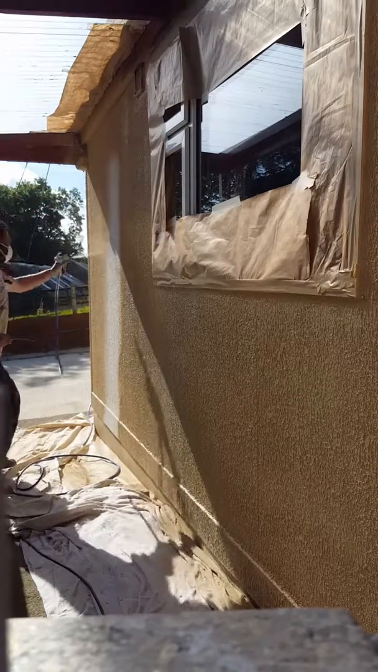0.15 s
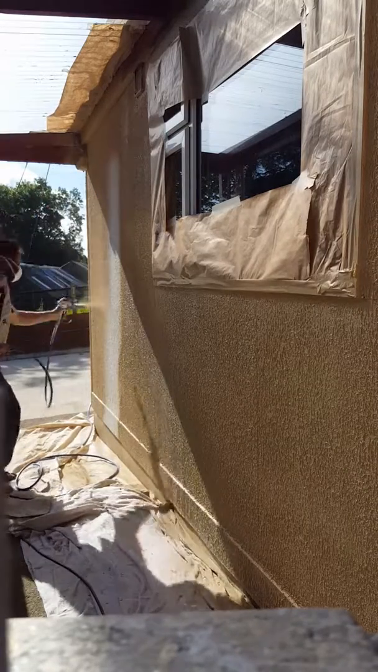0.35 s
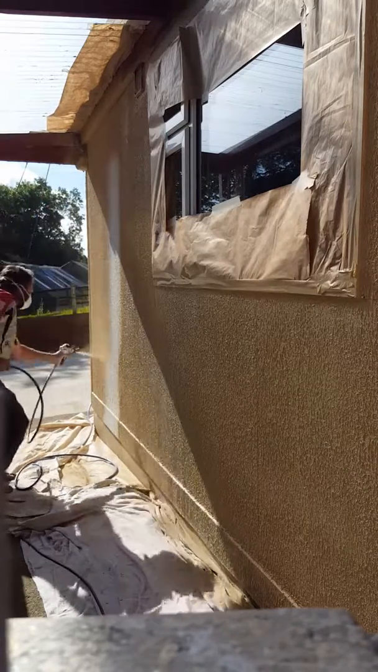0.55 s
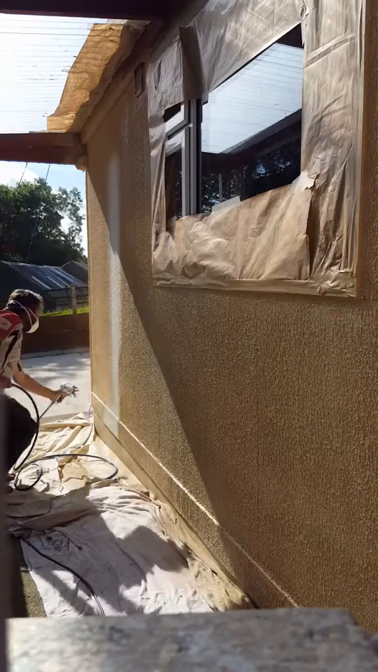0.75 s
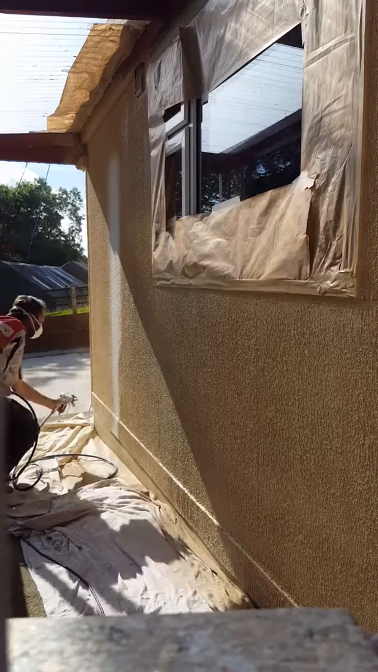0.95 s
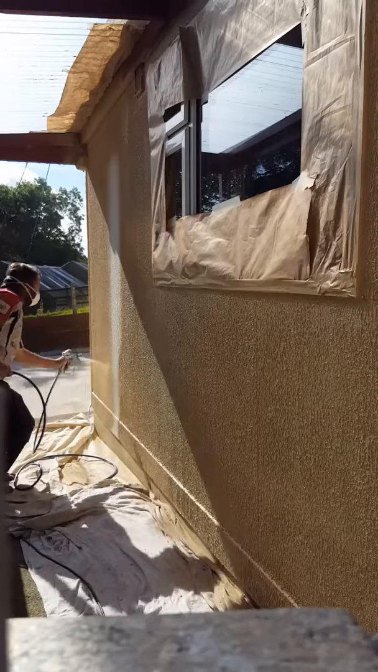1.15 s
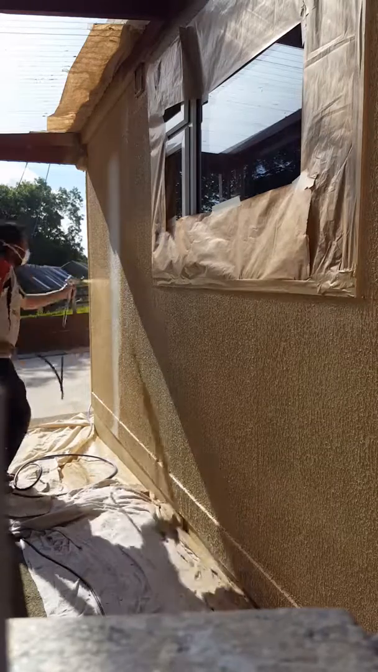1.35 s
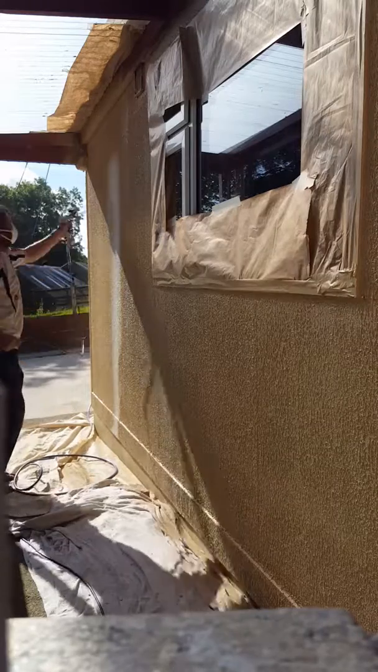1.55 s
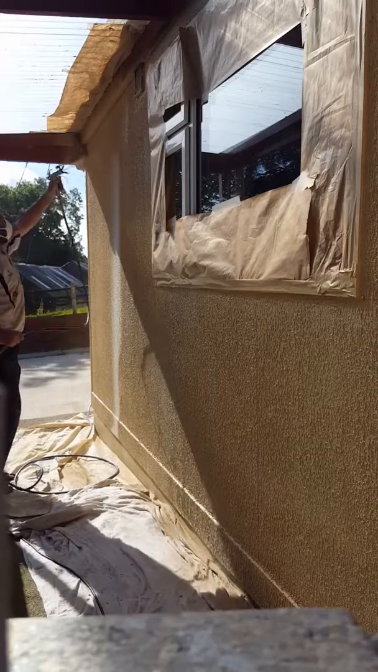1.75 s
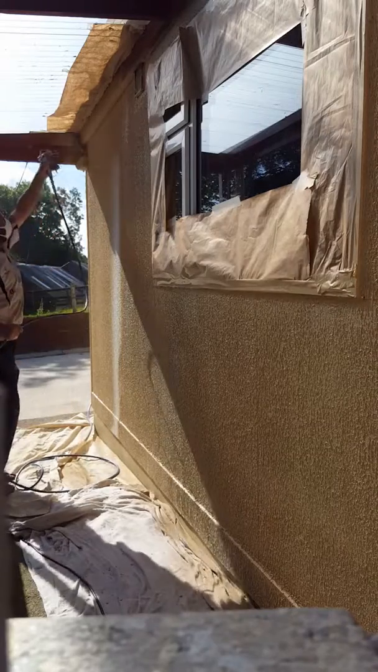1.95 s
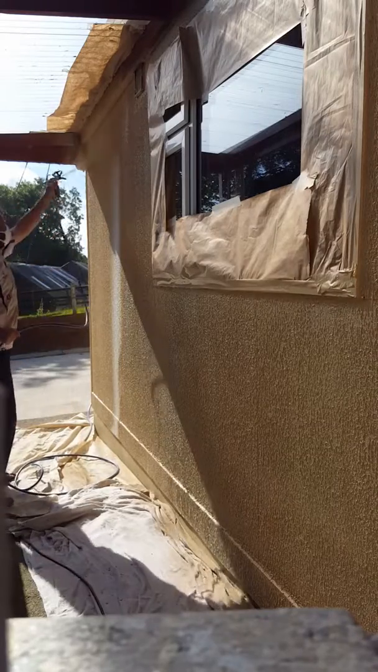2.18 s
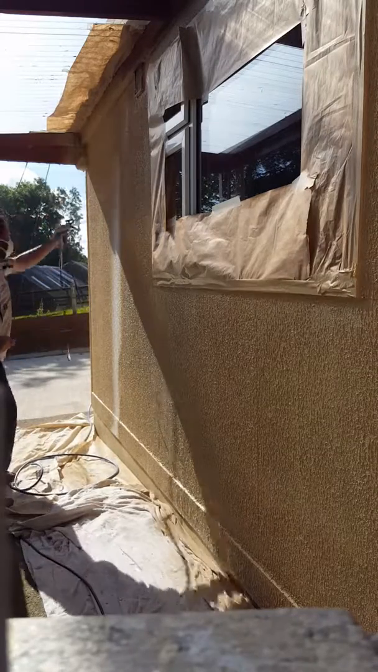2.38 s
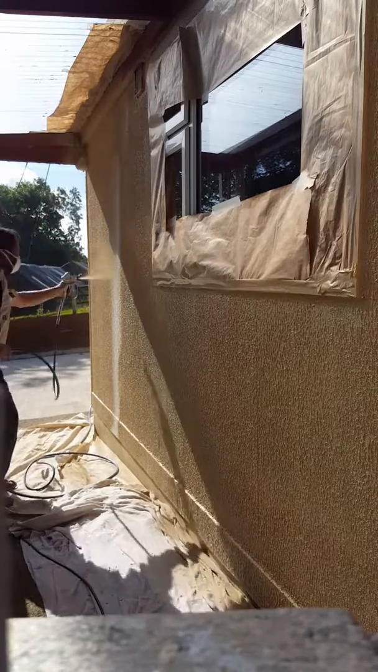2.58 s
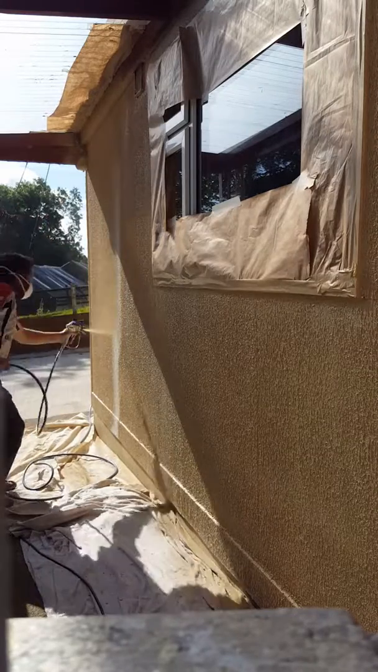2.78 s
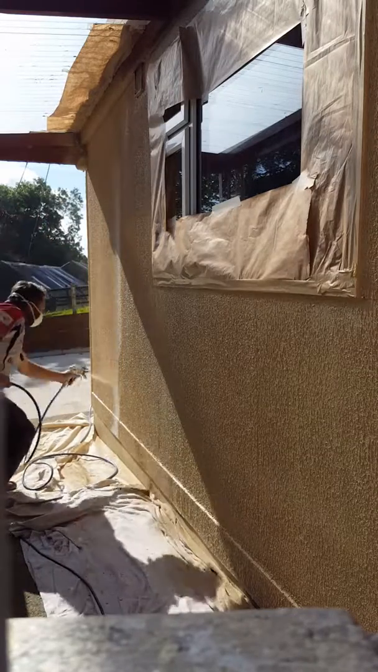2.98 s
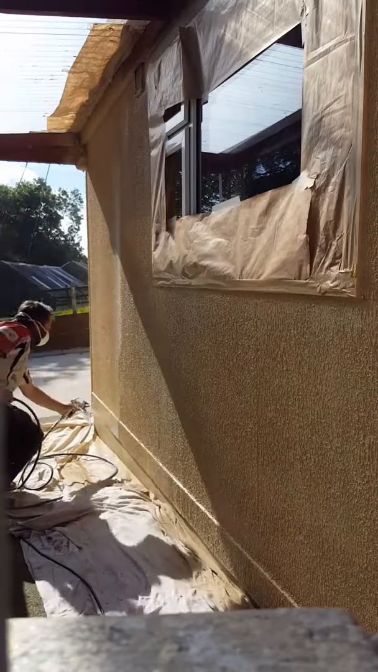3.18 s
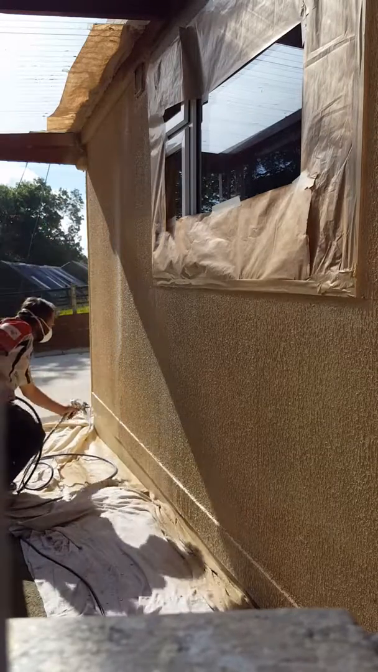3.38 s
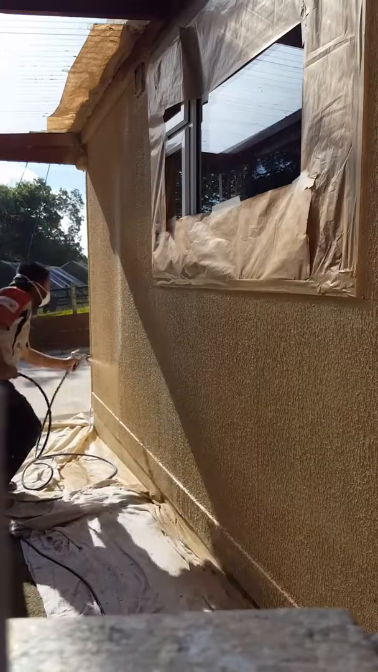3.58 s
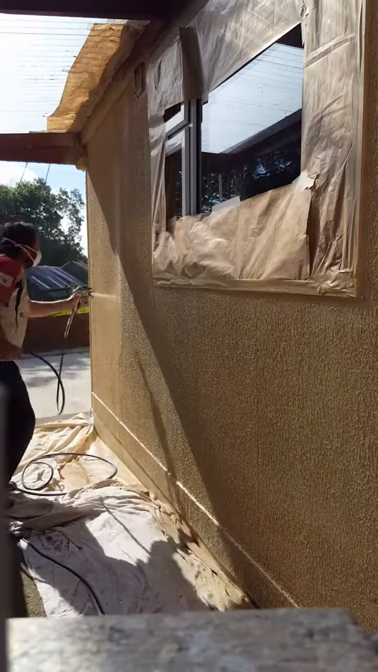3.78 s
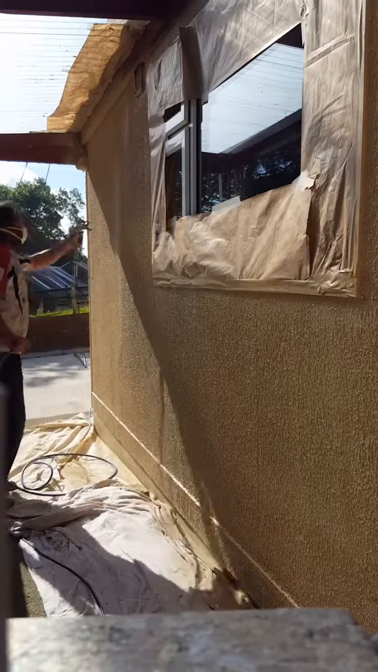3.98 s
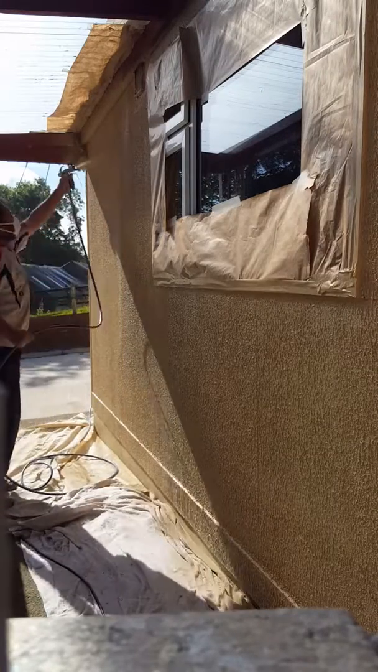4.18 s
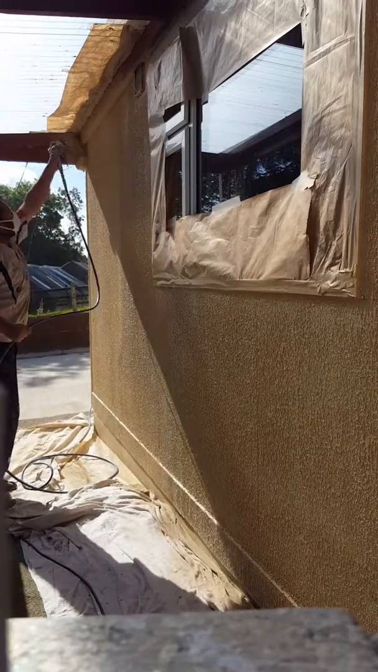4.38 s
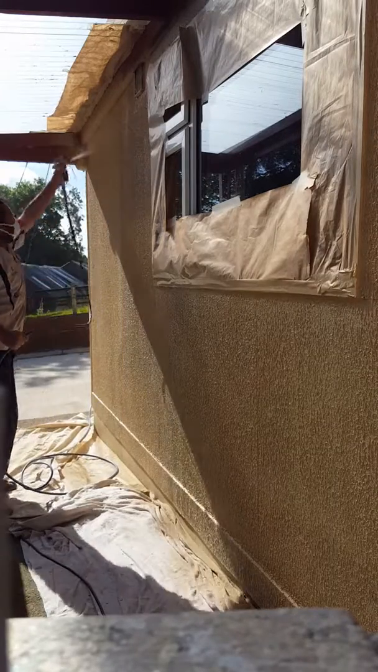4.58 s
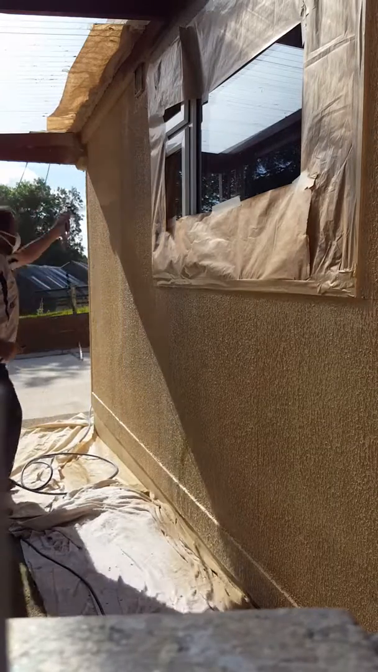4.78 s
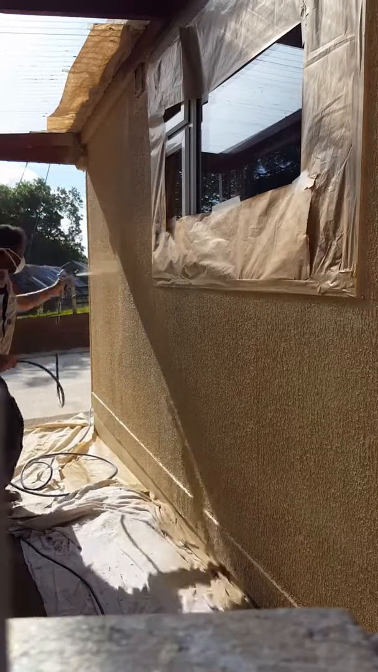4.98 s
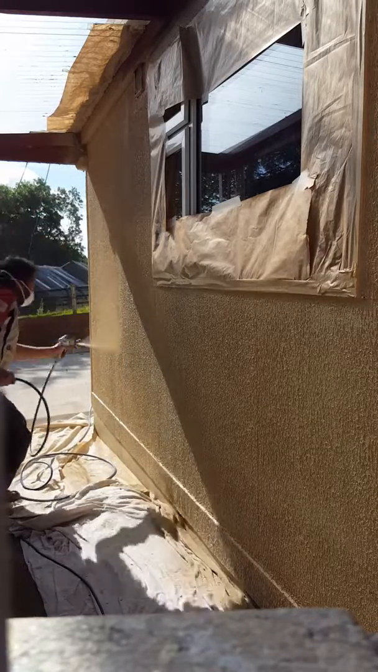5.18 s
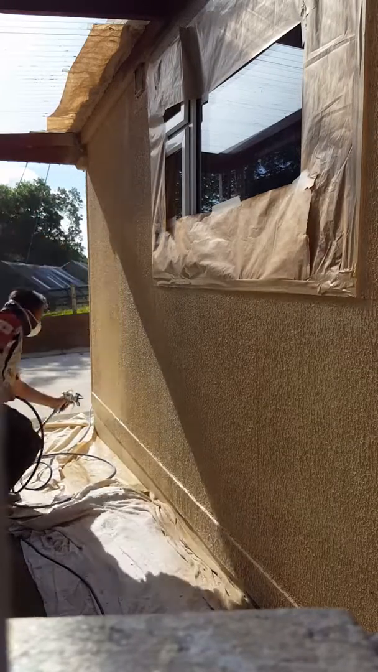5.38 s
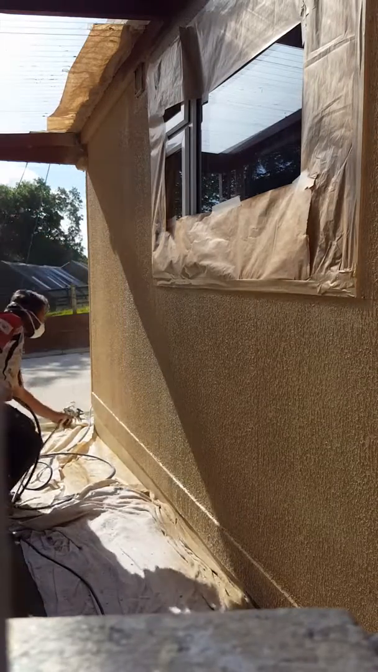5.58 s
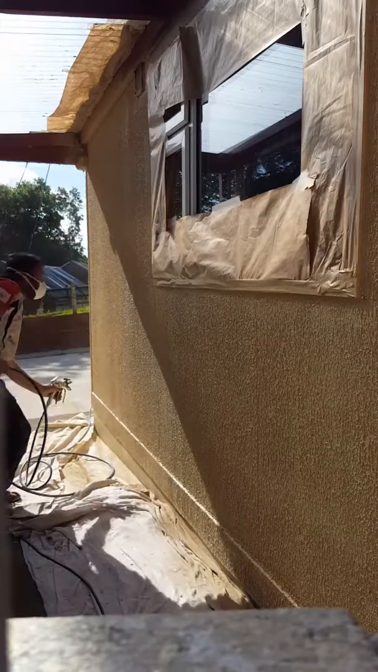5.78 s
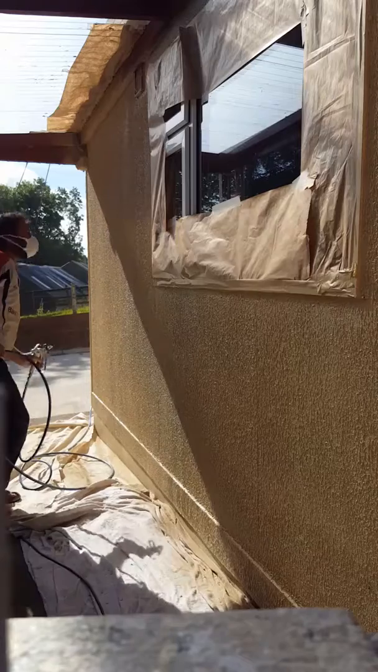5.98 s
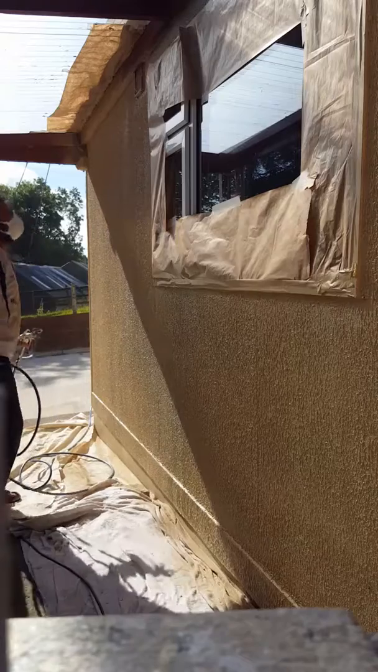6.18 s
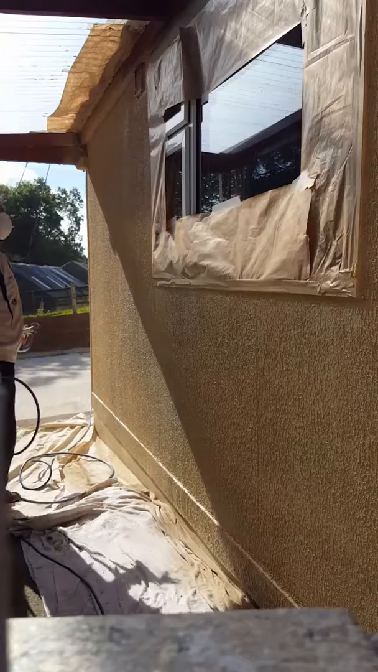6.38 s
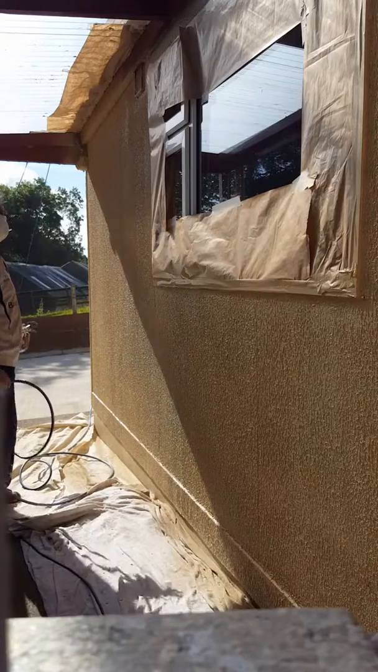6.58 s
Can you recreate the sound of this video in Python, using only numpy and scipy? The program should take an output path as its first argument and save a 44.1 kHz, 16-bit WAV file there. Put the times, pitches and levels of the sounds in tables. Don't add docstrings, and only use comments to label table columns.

```python
import sys
import numpy as np
from scipy import signal
from scipy.io import wavfile
from scipy.ndimage import uniform_filter1d

SR = 44100
rng = np.random.default_rng(int(sys.argv[2]) if len(sys.argv) > 2 else 0)


def voltage_ratio(decibels):
    exponent = np.asarray(decibels, float) / 20
    return 10 ** exponent


def wav_record(signal):
    frames = np.transpose(np.atleast_2d(signal))
    bounded = np.clip(frames, -1, 1)
    quanta = np.round(bounded * 32767).astype(np.int16)
    wavfile.write(sys.argv[1], SR, quanta)


N = 293104
PORT_LAG_S = 0.000482


def evened(x):
    return x / np.sqrt(np.mean(x ** 2) + 1e-20)


def read(points, hz):
    f, value = np.transpose(points)
    return np.interp(np.log(hz + 1), np.log(f + 1), value)


def curves(rows):
    s, *columns = np.transpose(rows)
    return [np.interp(np.arange(N) / SR, s, c) for c in columns]


def wander(length_s):
    size = max(int(length_s * SR), 2)
    once = uniform_filter1d(rng.standard_normal(N), size)
    return evened(uniform_filter1d(once, size))


def tone(hz):
    turns = np.cumsum(hz * np.ones(N)) / SR
    return np.sqrt(2) * np.sin(2 * np.pi * (turns + rng.random()))


def resonate(x, hz, width_hz):
    turn = np.exp(2j * np.pi * np.cumsum(hz * np.ones(N)) / SR)
    r = np.exp(-np.pi * width_hz / SR)
    return 2 * (turn * signal.lfilter([1 - r], [1, -r], x / turn)).real


# frequency in Hz, likeness from 0 to 1.
PORT_LIKENESS = [(30, 1), (160, 1), (270, .92), (700, .85), (1200, 0.74), (2500, 0.12), (5000, 0.16),
                 (9000, 0.0996)]


def noise(spectrum, patchy_db, size=512, tilt_db=None):
    hop = size // 4
    frames, hz = N // hop + 5, np.fft.rfftfreq(size, 1 / SR)
    a, b, c, d, patches = rng.standard_normal((frames, len(hz), 5)).T
    patches = uniform_filter1d(patches, size=4, axis=0)
    patches = evened(uniform_filter1d(patches, size=24, axis=1))
    same = np.clip(read(PORT_LIKENESS, hz), -1, 1)[:, None]
    lag = np.exp(-2j * np.pi * np.maximum(hz - 900, 0) * PORT_LAG_S)[:, None]
    left = a + 1j * b
    right = same * lag * left + np.sqrt(1 - same ** 2) * (c + 1j * d)
    field_db = read(spectrum, hz)[:, None] + patchy_db * patches
    if tilt_db is not None:
        octaves = np.log2((hz[:, None] + 99) / 6000)
        field_db = field_db + octaves * tilt_db[np.minimum(np.arange(frames) * hop, N - 1)]
    z = np.array([left, right]) * voltage_ratio(field_db)
    return evened(signal.istft(z, nperseg=size, noverlap=size - hop)[1][:, :N])


# frequency in Hz, level in dB per Hz.
YARD_WASH = [(30, -25), (60, -5.5), (110, 1.5), (200, -8.5), (300, -12.5), (600, -15), (1000, -9),
             (1500, -17), (2200, -25.5), (3500, -35), (6000, -39.5), (9000, -42.5), (10500, -51.5),
             (14000, -48)]
# time in seconds, fifth order in Hz, level in dB.
ENGINE_IDLE = [
    (0, 110.5, -52),
    (1.1, 109.8, -53.5),
    (1.66, 112.3, -48.5),
    (3.3, 112.4, -50.5),
    (3.6, 111, -50.5),
    (5.6, 111, -52.5),
    (5.9, 109.7, -48),
    (6.65, 109.5, -55),
]
# engine order, level in dB.
ORDERS = [(3, -10.5), (5, 2.5), (6, 0), (8, -7.5)]
# time in seconds, pitch in Hz, level in dB.
COMPRESSOR_IDLE = [
    (0, 90.8, -52.5),
    (1.3, 91.9, -48),
    (1.5, 92.4, -62),
    (1.65, 95.2, -46.5),
    (3.0, 94.5, -56),
    (3.9, 90.7, -54.5),
    (4.8, 91.4, -54.5),
    (6.1, 93.5, -50.5),
    (6.65, 92.8, -61),
]


def yard():
    hz, db = curves(ENGINE_IDLE)
    drone = sum(tone(hz * k / 5) * voltage_ratio(db + order_db + 1.9 * wander(0.082)) for k, order_db in ORDERS)
    hz, db = curves(COMPRESSOR_IDLE)
    hz = hz * (1 + 0.0065 * wander(0.092))
    drone += tone(hz) * voltage_ratio(db + 2.0 + 1.2 * wander(0.059))
    drone += tone(2 * hz) * voltage_ratio(db - 9 + 2.1 * wander(0.048))
    drone += tone(122) * voltage_ratio(-58.5)
    late = np.roll(drone, 11)
    return np.array([drone, late]) + noise(YARD_WASH, patchy_db=0.0, size=2048) * voltage_ratio(-44.5)


# start in seconds, length in seconds, pitch in Hz, level in dB.
BIRD_CALL = (6.157, .045, 6520, -58)


def bird():
    s, length, hz, db = BIRD_CALL
    u = np.clip((np.arange(N) / SR - s) / length, 0, 1)
    shape = np.minimum(u * 9, 1) * np.sqrt(1 - u)
    return tone(hz) * voltage_ratio(db) * shape * np.array([[.5], [1]])


CYCLE_S = 0.1812
LABOUR_S = 5.76


def reversals():
    last_s, last_db = 6.099, -34
    at = np.arange(0.085, last_s - CYCLE_S / 2, CYCLE_S)
    late, louder = rng.standard_normal((len(at), 2)).T
    rows = np.transpose([at + 0.003 * late, -32 + 1 * louder])
    return np.vstack([rows, (last_s, last_db)])


# delay in seconds, frequency in Hz, level in dB, t60 in seconds.
KNOCK_RINGS = [(0.0017, 252, -4, 0.086), (0.0021, 332, -4, 0.093), (0, 473, 0, 0.034), (0, 760, -8.5, .03),
               (.006, 1040, -0.5, 0.042), (.012, 1597, -3.5, 0.046), (.008, 1988, -7.5, 0.094),
               (.022, 1400, -17, 0.035), (.09, 913, -12.5, 0.066), (.09, 425, -3.5, .05)]


def knocks(blows):
    out, t = np.zeros((2, N + SR)), np.arange(4000) / SR
    chance = rng.standard_normal((len(blows), len(KNOCK_RINGS), 2))
    for (s, blow_db), row in zip(blows, chance):
        for (delay, hz, db, t60), (louder, higher) in zip(KNOCK_RINGS, row):
            ring = np.sin(2 * np.pi * hz * (1 + 0.013 * higher) * t)
            ring *= 1 - np.exp(-t / 0.0027)
            k = round((s + abs(delay)) * SR)
            out[:, k:k + len(t)] += voltage_ratio(blow_db + db + 1.3 * louder - 60 * t / t60) * ring
    return out[:, :N]


def mesh(speed, cycle):
    t = np.arange(N) / SR
    sag = 0.0199 * np.sin(2 * np.pi * (cycle - .05))
    hz = 1803 * speed * (1 + sag + 0.0061 * wander(0.0063))
    note = tone(hz) * voltage_ratio(-50.5 + 2.9 * wander(.012) + 1.9 * wander(0.096))
    surge = sum((t >= pull) * np.exp(-abs(t - pull) / 0.6) for pull, *_ in STROKES)
    strain = (t > LABOUR_S) * (t < LABOUR_S + CYCLE_S)
    bite_db = -38.5 - 16 * (1 - surge) + 16 * strain + 1.6 * wander(0.11)
    peak = np.exp(-.5 * ((cycle - 0.8) / 0.09) ** 2)
    note += tone(1737 * speed) * peak * voltage_ratio(bite_db)
    return np.array([note, np.roll(note, 12)])


# frequency in Hz, width in Hz, level in dB.
HOUSING_MODES = [(1803, 43, -50), (924, 30, -52.5), (1064, 42, -66), (1337, 25, -51), (1438, 39, -59),
                 (1530, 86, -60), (422.5, 35, -54.5), (6040, 220, -66)]


def housing(speed):
    whine = np.zeros((2, N))
    for hz, width_hz, db in HOUSING_MODES:
        common, own = rng.standard_normal(N), rng.standard_normal((2, N))
        shared = common * [[1], [np.cos(hz * 2 * np.pi * PORT_LAG_S)]]
        whine += voltage_ratio(db) * evened(resonate(0.64 * shared + 0.63 * own, hz * speed, width_hz))
    return whine


# frequency in Hz, level in dB per Hz.
MOTOR_NOISE = [(250, -8.5), (450, -5), (900, -0.5), (1300, -3.5), (1800, -1.5), (2150, -11), (2650, -9),
               (2800, -17.5), (4000, -16), (5200, -22.5), (6000, -13.5), (6800, -21), (9400, -21.5),
               (11000, -41)]
# share of the cycle from 0 to 1, whine in dB, noise in dB.
PISTON_LOAD = [(0, 3.5, -3), (.08, -0.5, 2.5), (.16, 4, -1.5), (.42, 1.5, 0.5), (.55, -4, 0),
               (0.651, 3.5, 0), (.75, 4, -3), (.88, 4, -2), (0.999, -7, 0)]


def pump():
    t = np.arange(N) / SR
    labour = np.maximum(t - LABOUR_S, 0)
    speed = 1 - 0.12 * labour
    level_db = -11.5 * labour - 330 * np.maximum(t - 6.14, 0)
    blows = reversals()
    at = np.concatenate([[blows[0, 0] - CYCLE_S], blows[:, 0], [blows[-1, 0] + CYCLE_S]])
    cycle = np.interp(t, at, np.arange(len(at))) % 1
    share, whine_db, noise_db = np.transpose(PISTON_LOAD)
    whine = housing(speed) + mesh(speed, cycle)
    whine *= voltage_ratio(np.interp(cycle, share, whine_db))
    motor = noise(MOTOR_NOISE, patchy_db=2.0) * voltage_ratio(-39.5 + np.interp(cycle, share, noise_db))
    return (whine + motor) * voltage_ratio(level_db) + knocks(blows)


# trigger pull in seconds, release in seconds,
# jet level at the start in dB, at the end in dB.
STROKES = [
    (0.0, 1.088, -25, -27),
    (1.214, 2.054, -26, -25),
    (2.165, 3.382, -24, -27),
    (3.461, 4.5, -25.5, -25),
    (4.62, 5.642, -23.5, -26.5),
]
# frequency in Hz, level in dB per Hz.
JET_HISS = [(500, -47), (1400, -21.5), (2100, -9), (2900, -8), (3250, -10.5), (4200, -5), (5500, -4.5),
            (7200, -1), (8500, -2), (9300, -7), (10200, -12.5), (11500, -9.5), (13500, -10), (14400, -12)]


def gun():
    t = np.arange(N) / SR
    flow, tilt_db = np.zeros(N), np.zeros(N)
    for start, end, first_db, last_db in STROKES:
        since, after = np.maximum(t - start, 0), np.maximum(t - end, 0)
        along = np.clip(since / (end - start), 0, 1)
        opening = 1
        if start:
            filling_db = -4 * np.exp(-since / 0.021)
            opening = np.clip((t - start) / 0.0087, 0, 1) * voltage_ratio(filling_db)
        closing_db = -286 * after - 4.5 * np.tanh(after / 0.018)
        level_db = first_db + (last_db - first_db) * along + closing_db
        flow = np.maximum(flow, opening * voltage_ratio(level_db))
        tilt_db = np.where(t >= start, 0.5 - 2.0 * along, tilt_db)
    flutter_db = 0.67 * wander(0.033) + 0.34 * wander(0.0027)
    sides = voltage_ratio(np.array([[3], [-3]]) / 2)
    return noise(JET_HISS, patchy_db=1.0, tilt_db=tilt_db) * flow * sides * voltage_ratio(0.5 + flutter_db)


# frequency in Hz, t60 in seconds.
WALL_DECAY, WALL_DB = [(300, 0.089), (3000, 0.22), (7000, 0.29), (12000, 0.085)], -12


def wall(x):
    taps = np.zeros((2, SR // 2))
    slots = np.arange(300, SR // 2 - 20, 20)
    at = slots + rng.integers(0, 20, (2, len(slots)))
    np.put_along_axis(taps, at, rng.choice([-1., 1.], at.shape), 1)
    hz, t, z = signal.stft(taps, SR, nperseg=256)
    decay = voltage_ratio(-60 * t / read(WALL_DECAY, hz)[:, None])
    tail = signal.istft(z * decay, SR, nperseg=256)[1]
    return signal.fftconvolve(x, tail / np.linalg.norm(tail[0]), axes=1)[:, :N]


def scene():
    near = gun() + pump()
    return near + voltage_ratio(WALL_DB) * wall(near) + yard() + bird()


def low_pass(x):
    return signal.sosfilt(signal.butter(12, 15770, fs=SR, output="sos"), x)


# frequency in Hz, level in dB.
PORT_COLOUR = [(300, 0.3), (900, 1.4), (1400, 5.5), (2500, 7), (4500, 9), (6000, 7), (7500, 4),
               (8600, -1.5), (9200, -16), (9800, -18), (10500, -4), (11200, -9.5), (12500, 3), (14000, 1.5)]
# frequency in Hz, depth in dB.
DROP_DEPTH = [(170, 48), (230, 35), (380, 34.5), (470, 38.5), (800, 38), (1100, 39.5), (2000, 41),
              (3400, 41), (4000, 60), (8800, 60), (9300, 43), (10000, 44), (10400, 53), (14000, 54)]


def record(dry):
    hz, t, z = signal.stft(dry, SR, "cosine", nperseg=2048, noverlap=1024)
    z[1] *= voltage_ratio(read(PORT_COLOUR, hz))[:, None]
    z *= voltage_ratio(-np.clip((hz - 14600) / 4, 0, 90))[:, None]
    power = abs(z) ** 2
    band = np.where(hz < 1500, hz // 86, np.where(hz < 4000, 20 + hz // 172, 50 + hz // 345))
    member = band[:, None] == band
    band_db = 10 * np.log10(member / member.sum(0) @ power + 1e-16)
    loud_db = 10 * np.log10(power[:, hz > 1000].sum(1, keepdims=True) + 1e-16)
    kept = band_db > loud_db - read(DROP_DEPTH, hz)[:, None]
    z *= np.where(kept, 1, .03)
    mix = signal.istft(z, SR, "cosine", nperseg=2048, noverlap=1024)[1][:, :N]
    return low_pass(mix)


dry = scene()
out = record(dry)
wav_record(out)
```